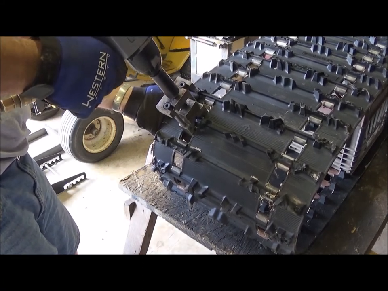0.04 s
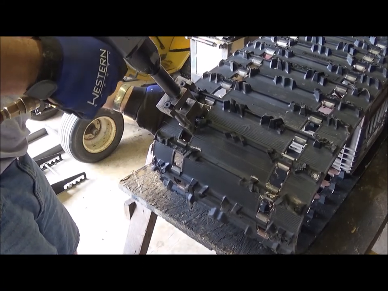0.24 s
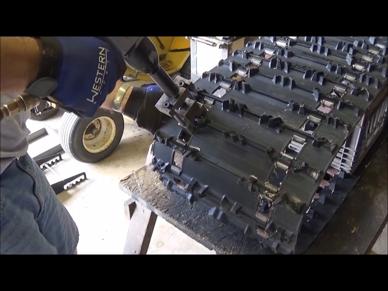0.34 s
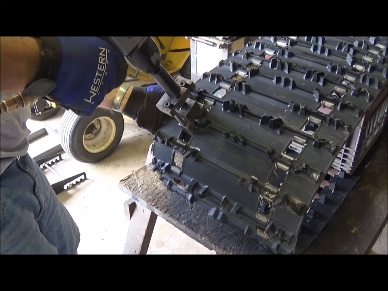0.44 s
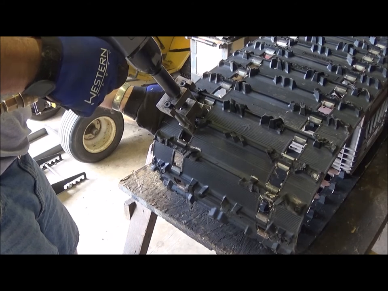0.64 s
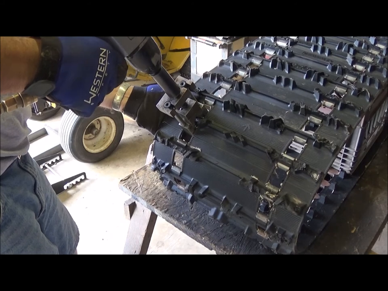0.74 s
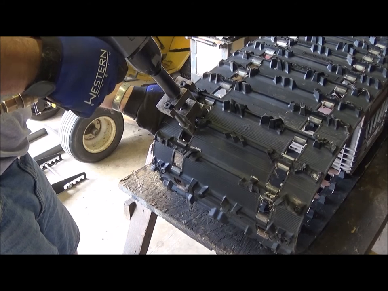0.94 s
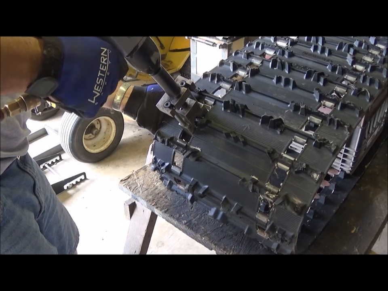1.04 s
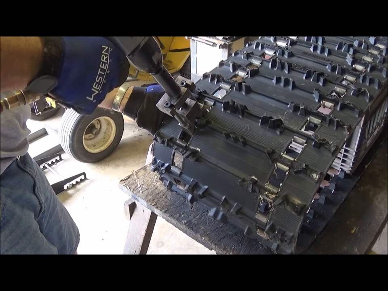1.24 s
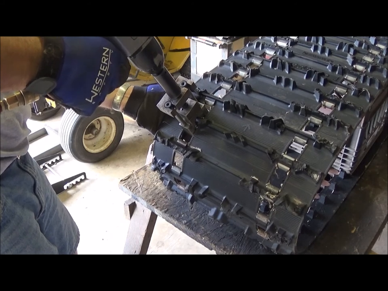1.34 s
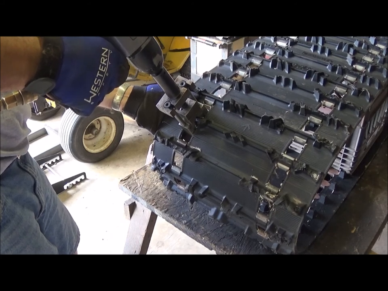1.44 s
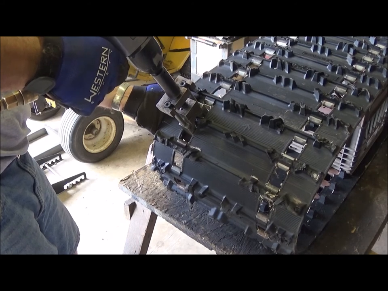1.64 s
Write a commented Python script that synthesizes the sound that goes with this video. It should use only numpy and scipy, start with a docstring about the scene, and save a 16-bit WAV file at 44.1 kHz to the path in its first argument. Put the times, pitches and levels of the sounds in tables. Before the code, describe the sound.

An air-powered wrench runs twice, close to a narrow stereo microphone: sharp air hiss, motor hum, gear rattle and metallic clacks. Each burst dies into a short garage echo; a faint bird whistles between them.

```python
"""Air wrench in a garage

An air wrench runs two short bursts close to a narrow stereo microphone.
Air jets are noise in the exhaust resonances, the vane motor hums in harmonics of its vane rate,
the gears rattle as dense random ticks and the drive clacks; decaying noise tails form the garage.
Between the bursts a far bird whistles in gliding sines; a faint tone pulses over the quiet floor."""
import sys
import numpy as np
from scipy import signal
from scipy.fft import rfft, irfft, next_fast_len
from scipy.io import wavfile
from scipy.ndimage import uniform_filter1d

SR = 44100
rng = np.random.default_rng(int(sys.argv[2]) if len(sys.argv) > 2 else 0)


def undo_db(level):
    """Turn decibels back into plain size, where 20 dB means ten times bigger."""
    steps = np.asarray(level, float) / 20
    return 10 ** steps


def to_wav(s):
    """Save 16-bit WAV."""
    ch = np.atleast_2d(s).T  # columns
    pcm = np.round(np.clip(ch, -1, 1) * 32767)  # PCM
    wavfile.write(sys.argv[1], SR, pcm.astype(np.int16))


N = 74970

# Exhaust jet, one table a burst. Each row: time in seconds, level of the low whistling bands in dB,
# level of the high whistling bands in dB, level of the broad hiss in dB.
EXHAUST_JET = [
    [(.219, -60, -60, -61), (.226, -32, -44.5, -39.5), (.24, -18, -23.5, -19.5), (.252, -25.5, -10, -21),
     (.265, -20.5, -25.5, -14.5), (.3, -22.5, -24, -14.5), (.41, -25.5, -21, -16),
     (.444, -33, -41.5, -14.5), (.456, -37, -40, -23.5), (.462, -53, -61, -44)],
    [(1.028, -63, -57.5, -54.5), (1.033, -34, -47, -48), (1.043, -40, -32.5, -32.5),
     (1.05, -29, -12.5, -27), (1.062, -24, -26.5, -15), (1.12, -25, -21.5, -14.5), (1.2, -20.5, -28.5, -19),
     (1.268, -36.5, -32, -14.5), (1.274, -55, -49.5, -36)],
]
# Vane motor, one table a burst. Each row: time in seconds, mean rate of passing vanes in Hz, hum level in dB.
VANE_MOTOR = [
    [(.268, 195, -55), (.29, 228, -37), (.324, 269, -34), (.35, 286, -32), (.42, 283, -34),
     (.455, 280, -36), (.475, 277, -55)],
    [(1.06, 185, -55), (1.1, 212, -38), (1.126, 246, -36), (1.15, 267, -33), (1.23, 269, -33),
     (1.262, 264, -33), (1.278, 262, -55)],
]


def evened(x):
    """Normalisation: scales a signal to an rms of 1."""
    return x / np.sqrt(np.mean(x ** 2) + 1e-20)


def colour(x, points):
    """Linear filtering: multiplies the spectrum by a gain in dB drawn over log frequency."""
    size = next_fast_len(len(x) + 4096)
    hz, db = np.transpose(points)
    bins = np.fft.rfftfreq(size, 1 / SR)
    gain = undo_db(np.interp(np.log(bins + 1), np.log(hz), db))
    return irfft(rfft(x, size) * gain, size)[:len(x)]


def curve(tables, column, off=None):
    """Envelope: interpolates a column of the burst tables over time, with off outside the bursts."""
    t = np.arange(N) / SR
    rows = np.concatenate(tables)
    out = np.interp(t, rows[:, 0], rows[:, column])
    if off is None:
        return out
    inside = sum((t >= burst[0][0]) & (t <= burst[-1][0]) for burst in tables) > 0
    return np.where(inside, out, off)


def ring(modes):
    """Modal response: one blow excites sines that die exponentially, each by 60 dB in its t60."""
    t = np.arange(SR // 4) / SR
    return sum(undo_db(db - 60 * t / t60) * np.sin(2 * np.pi * hz * t) for hz, db, t60 in modes)


def struck_modes(blows, modes):
    """Superposition: each blow, a unit impulse scaled in dB, sets off the same modal response."""
    impulses = np.zeros(N)
    for start, db in blows:
        impulses[round(start * SR)] += undo_db(db)
    return signal.oaconvolve(impulses, ring(modes))[:N]


def resonate(x, hz, width):
    """Resonance: a two-pole peak of gain 1 at its centre."""
    return signal.lfilter(*signal.iirpeak(hz, hz / width, SR), x)


def whistling_bands(air, table):
    """Resonant selection: noise passes twice through each peak, which steepens its skirts."""
    total = 0
    for hz, width, db in table:
        once = resonate(air, hz, width)
        total = total + undo_db(db) * resonate(once, hz, width)
    return evened(total)


def jet(turns):
    """Turbulent jet noise: air in the exhaust resonances, chopped by the vanes and fluttering."""
    # Each row: centre in Hz, width of a single pass in Hz, relative level in dB.
    low_bands = [(5062, 990, -2), (5600, 810, -7.5)]
    high_bands = [(8520, 880, -2), (9270, 230, 1.5), (9890, 540, 1.5)]
    # Each row: frequency in Hz, relative gain of the broad hiss in dB.
    hiss = [(300, -51), (1500, -28), (3500, -16), (6500, -16), (10000, -15.5), (11500, -24), (15500, -25.5)]
    gate_depth, flutter_db = 0.36, 0.5  # flutter as rms deviation
    air = rng.standard_normal(N)
    slow = uniform_filter1d(rng.standard_normal(N), size=90)
    flutter = evened(uniform_filter1d(slow, size=90))
    chopped = 1 + gate_depth * np.cos(2 * np.pi * turns)
    gate = evened(chopped * undo_db(flutter_db * flutter))
    parts = (whistling_bands(air, low_bands), whistling_bands(air, high_bands), evened(colour(air, hiss)))
    return gate * sum(part * undo_db(curve(EXHAUST_JET, k + 1, off=-200)) for k, part in enumerate(parts))


def struck_housing(clicks):
    """Impact excitation: clicks give a dry tick and ring the modes of the housing."""
    # Each row: frequency in Hz, gain of the dry tick in dB.
    tick = [(120, -35.5), (300, -1.5), (450, -10), (900, -3), (1300, 0.5), (2700, 1), (4500, -1),
            (7500, -3), (11000, -5.5), (15500, -28.5)]
    # Each row: mode in Hz, relative level in dB, t60 in seconds.
    housing = [(895, 0, .08), (1096, -5, .07), (1650, -14, .025), (2310, -10, .03), (2670, -8, .03),
               (3230, -14, .012), (4290, -12, .015), (4520, -12, .02), (7550, -15, .02), (8300, -15, .02)]
    ring_db = -16.5  # level of the unit-energy ringing response
    body = ring(housing)
    ringing = signal.oaconvolve(clicks, body / np.linalg.norm(body))[:N]
    return colour(clicks, tick) + undo_db(ring_db) * ringing


def rattle():
    """Random impact train: dense uneven ticks of the gears, each a very short crackle."""
    # One table a burst. Each row: time in seconds, level in dB.
    loudness = [
        [(.222, -36.5), (.25, -27), (.275, -31.5), (.33, -16), (.38, -17.5), (.44, -25), (.455, -19),
         (.485, -23), (.5, -45)],
        [(1.03, -40), (1.055, -69), (1.065, -32.5), (1.11, -20.5), (1.2, -19), (1.265, -28.5), (1.28, -24.5),
         (1.315, -22), (1.33, -53)],
    ]
    ticks_per_s, tick_spread_db = 2700, 4.5
    tick_s = 0.00046  # the power of a tick falls by a factor e in this time
    sizes = undo_db(tick_spread_db * np.minimum(rng.exponential(1, N), 3))
    sizes *= rng.random(N) < ticks_per_s / SR
    power = signal.lfilter([1], [1, -np.exp(-1 / (tick_s * SR))], sizes ** 2)
    ticks = np.sqrt(power) * rng.standard_normal(N)
    steady_rms = np.sqrt(np.mean(struck_housing(ticks) ** 2))
    return struck_housing(ticks * undo_db(curve(loudness, 1, off=-200))) / steady_rms


def clacks():
    """Impact noise: each clack of the drive is a sudden short burst of crackle into the housing."""
    # Each row: start in seconds, strength in dB, length to a fall by e in seconds, brightness in dB per octave.
    table = [(0.251, -14, 0.0063, 4.5), (0.2732, -9.5, 0.018, 0.5), (.3998, -14.5, 0.0062, -2.5),
             (0.4242, -4, 0.0046, 1.5), (.4486, -7, .002, -0.2), (0.4864, -6.5, 0.0043, 1),
             (1.0577, -9.5, 0.0064, 5.5), (1.0733, -6.5, 0.0019, 0.5), (1.1157, -14.5, .003, -4.5),
             (1.2401, 3, 0.00092, 2.5), (1.2417, -16, 0.0049, 1.8), (1.2653, -11, 0.0011, -4.5),
             (1.268, -14.5, 0.0074, 0.5), (1.3181, -5, 0.0012, 2), (1.3211, -7, 0.00237, 2)]
    out = np.zeros(N)
    for start, db, length, tilt_db in table:
        burst = rng.standard_normal(1024) * np.exp(-(np.arange(1024) / SR / length) ** 2)
        at = round(start * SR)
        # the tilt pivots at 4 kHz, three octaves above its low end
        out[at:at + 1024] += undo_db(db) * colour(burst, [(500, -3 * tilt_db), (16000, 2 * tilt_db)])
    return struck_housing(out)


def falter():
    """Amplitude modulation: the tool falters for an instant, a Gaussian notch in its gain in dB."""
    # Each row: time in seconds, gain at the notch in dB.
    stalls = [(.272, -8), (.352, -6), (.4468, -14), (1.073, -11), (1.164, -10), (1.2378, -12), (1.316, -8)]
    stall_s = .0013  # standard deviation
    t = np.arange(N) / SR
    return undo_db(sum(db * np.exp(-.5 * ((t - s) / stall_s) ** 2) for s, db in stalls))


def vane_turns():
    """Phase as the integral of frequency: vanes passed so far, at a slightly wobbling rate."""
    hum_wobble = .014  # rms share of the rate
    wobble = evened(uniform_filter1d(rng.standard_normal(N), size=400))
    return np.cumsum(curve(VANE_MOTOR, 1) * (1 + hum_wobble * wobble)) / SR


def hum(turns):
    """Harmonic series: low multiples of the vane rate, in random phases."""
    # Each row: multiple of the vane rate, relative level in dB.
    harmonics = [(1, -1), (2, -5), (3, -10), (4, -10)]
    tones = sum(undo_db(db) * np.cos(2 * np.pi * (k * turns + rng.random())) for k, db in harmonics)
    return np.sqrt(2) * tones * undo_db(curve(VANE_MOTOR, 2, off=-200))


def valve_knocks():
    """Modal impact: the trigger valve knocks and its modes ring."""
    # Each row: time in seconds, strength in dB.
    knocks = [(.2377, -19), (1.0375, -26)]
    # Each row: mode in Hz, relative level in dB, t60 in seconds.
    valve = [(355, -5, .025), (900, -4, .03), (1100, 0, .07), (1647, -10, .025), (2345, -4, .06)]
    return struck_modes(knocks, valve)


def trigger_thuds():
    """Damped modal impact: the finger on the trigger sets off low, quickly dying modes."""
    # Each row: time in seconds, strength in dB.
    thuds = [(.2195, -32), (1.0265, -32.5)]
    # Each row: mode in Hz, relative level in dB, t60 in seconds.
    grip = [(330, -5, 0.028), (708.2, -17.5, 0.014)]
    return struck_modes(thuds, grip)


def steel_pings():
    """Beating modes: a thin steel part pings at close high frequencies."""
    # Each row: time in seconds, strength in dB.
    pings = [(.354, -26.5), (.378, -33), (.449, -23.5), (1.169, -28), (1.216, -26.5), (1.24, -26.5),
             (1.267, -27)]
    # Each row: mode in Hz, relative level in dB, t60 in seconds.
    steel = [(14870, 0, .13), (14915, -5, .1), (15300, 0, .03)]
    return struck_modes(pings, steel)


def low_rumble():
    """Filtered noise: a faint low rumble follows the level of the broad hiss."""
    # Each row: frequency in Hz, relative gain in dB.
    rumble = [(20, 0.5), (60, -4.5), (130, 1.5), (250, -26.5)]
    against_hiss_db = -44
    level = undo_db(against_hiss_db + curve(EXHAUST_JET, 3, off=-200))
    return level * evened(colour(rng.standard_normal(N), rumble))


def garage(x):
    """Diffuse reverberation: noise tails for middle and side, each band dying at its own speed."""
    # Each row: frequency in Hz, t60 in seconds.
    decay = [(150, 0.19), (400, 0.54), (1040, 0.44), (2760, 0.54), (7280, 0.55), (12000, 0.31),
             (15500, 0.38)]
    # Each row: frequency in Hz, gain of the sound fed to the tails in dB.
    wet = [(100, -12), (400, -3), (2000, -7), (5500, -9.5), (9000, -7.5), (15000, -12.5)]
    tail_turn_hz, build_up_s = 2.286, 0.014
    hz, t, z = signal.stft(rng.standard_normal((3, 2, SR)), SR, nperseg=256)
    f, t60 = np.transpose(decay)
    band_t60 = np.interp(np.log(hz + 1), np.log(f), t60)[:, None]
    z *= undo_db(-60 * t / band_t60)
    tail = signal.istft(z, SR, nperseg=256)[1][..., :SR]
    tail = tail * np.minimum(np.arange(SR) / SR / build_up_s, 1)
    # three noise tails take turns, at constant total power
    cycles = tail_turn_hz * np.arange(N) / SR + np.arange(3)[:, None] / 3
    share = np.sqrt(2 / 3) * np.cos(2 * np.pi * cycles)
    fed = (colour(x, wet) * share)[:, None]
    return signal.fftconvolve(fed, tail / np.linalg.norm(tail[0, 0]), axes=2).sum(0)[:, :N]


def bird():
    """Frequency glide: sine notes with soft ends, roughened by random amplitude modulation."""
    # Each row: start in seconds, length in seconds, first frequency in Hz, last frequency in Hz,
    # level in dB ahead of the soft ends and the roughness.
    notes = [(.766, .04, 3300, 2800, -59), (.808, .034, 2550, 2640, -61), (.842, .044, 2500, 2030, -59),
             (.93, .035, 2200, 2185, -61), (.974, .03, 3030, 2900, -59)]
    rough_db = 4  # rms deviation
    out = np.zeros(N)
    for start, length, from_hz, to_hz, db in notes:
        u = np.linspace(0, 1, round(length * SR))
        phase = 2 * np.pi * np.cumsum(from_hz + (to_hz - from_hz) * u) / SR
        note = np.sin(phase) * np.sqrt(np.sin(np.pi * u).clip(0))
        out[round(start * SR):][:len(u)] += np.sqrt(2) * undo_db(db) * note
    roughness = evened(uniform_filter1d(rng.standard_normal(N), size=200))
    return out * undo_db(rough_db * roughness)


def pulsing_tone():
    """Periodic amplitude modulation: a faint tone in regular Gaussian pulses, equal in phase."""
    first_s, pulses_per_s = .0265, 29.96
    peak_db, pulse_s, tone_hz = -58.5, .0035, 2560  # pulse_s is a standard deviation
    t = np.arange(N) / SR
    away = (((t - first_s) * pulses_per_s + .5) % 1 - .5) / pulses_per_s  # seconds from the nearest pulse
    return undo_db(peak_db) * np.exp(-.5 * (away / pulse_s) ** 2) * np.sin(2 * np.pi * tone_hz * away)


def quiet_floor():
    """Stationary noise: one coloured draw of rms -59 dB."""
    # Each row: frequency in Hz, relative gain in dB.
    floor = [(24, -49.5), (40, -33), (129, -20.5), (564, -10), (841, -10), (1960, -13.5), (2600, -10),
             (3500, -12.5), (7750, -19.5), (13500, -22.5), (14800, -37)]
    return undo_db(-59) * evened(colour(rng.standard_normal(N), floor))


def scene():
    """Superposition in middle and side: tool, garage and background, turned into left and right."""
    # Each row: frequency in Hz, gain of the side signal in dB.
    width_gain = [(40, -37.5), (125, -20.5), (250, -20.5), (600, -13), (1200, -9), (2500, -13),
                  (5000, -7.5), (10300, -8), (11200, -52.5)]
    bass_cut_hz, hum_room_db = 168, -1
    floor_side_db, bird_side_db = 5, 3  # ahead of the side gain
    turns = vane_turns()
    tool = (jet(turns) + rattle()) * falter() + clacks()
    tool += valve_knocks() + trigger_thuds() + steel_pings()
    tool = signal.sosfilt(signal.butter(3, bass_cut_hz, "high", fs=SR, output="sos"), tool)
    motor = hum(turns)
    mid, side = garage(tool + undo_db(hum_room_db) * motor)
    song = bird()
    mid = mid + tool + motor + low_rumble() + quiet_floor() + song + pulsing_tone()
    side = side + undo_db(floor_side_db) * quiet_floor() + undo_db(bird_side_db) * song
    side = colour(side, width_gain)
    return np.array([mid + side, mid - side])


def low_pass(x):
    """Removes everything above the highest recorded frequency."""
    return signal.sosfilt(signal.butter(12, 16110, fs=SR, output="sos"), x)


def record(dry):
    """Soft saturation and low-pass filtering: peaks bend under full scale, the top band is cut."""
    knee, edge_hz = 6, 15850  # a higher knee bends later and harder
    bent = dry / (1 + abs(dry) ** knee) ** (1 / knee)
    edge = signal.firwin(511, edge_hz, window=("kaiser", 9), fs=SR)[None]
    mix = signal.oaconvolve(bent, edge, "same")
    return low_pass(mix)


dry = scene()
out = record(dry)
to_wav(out)
```